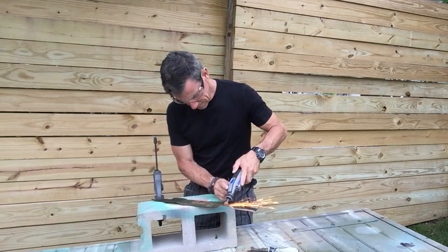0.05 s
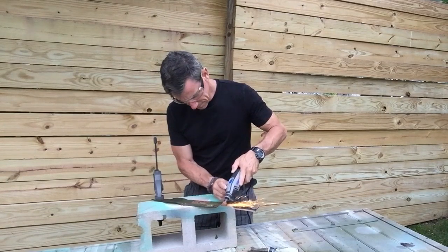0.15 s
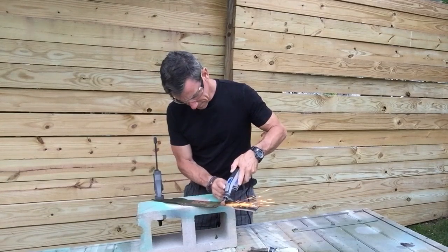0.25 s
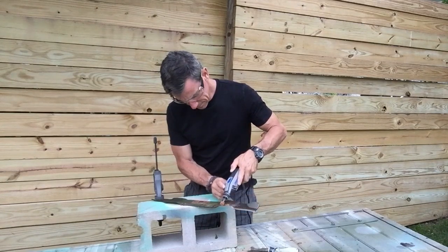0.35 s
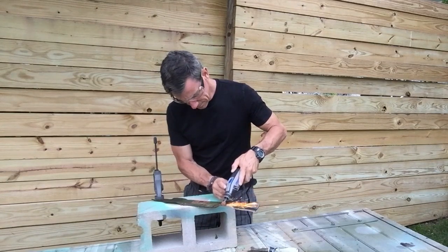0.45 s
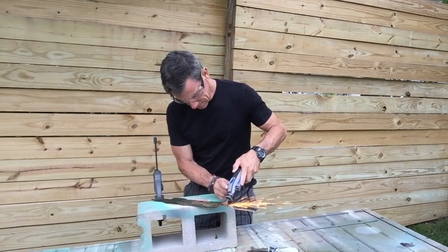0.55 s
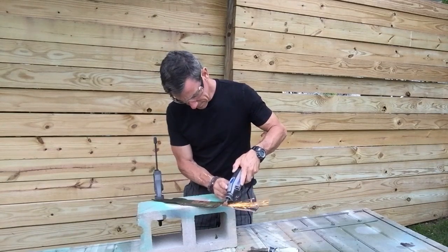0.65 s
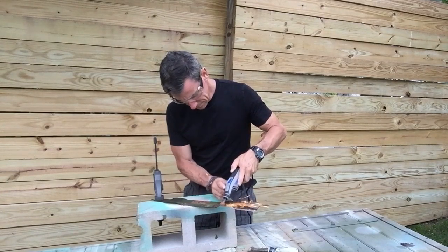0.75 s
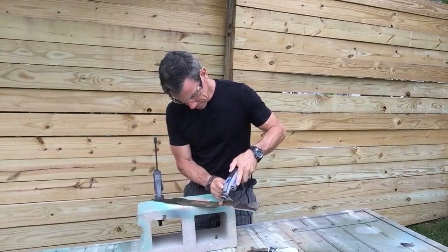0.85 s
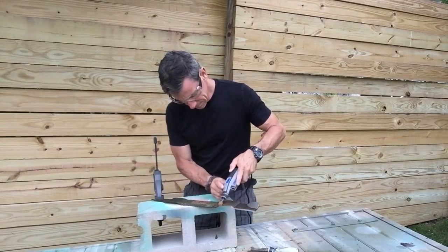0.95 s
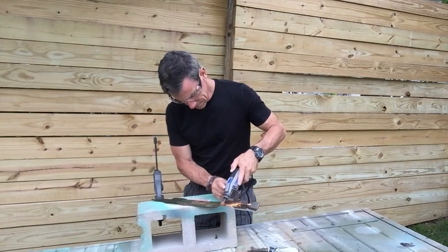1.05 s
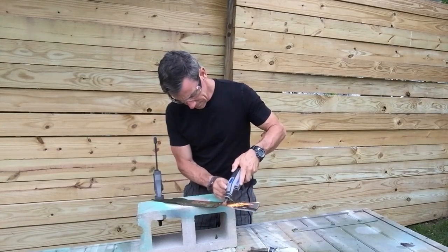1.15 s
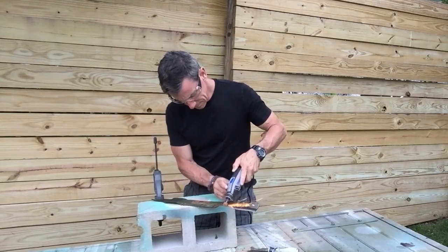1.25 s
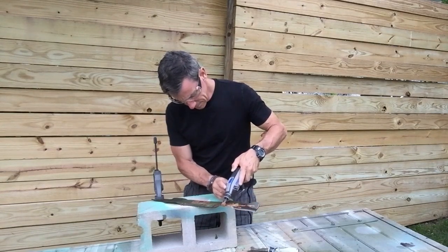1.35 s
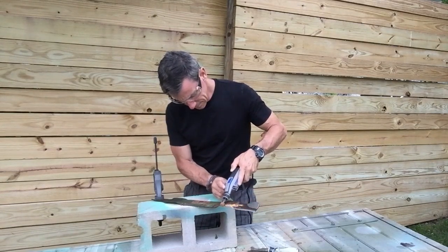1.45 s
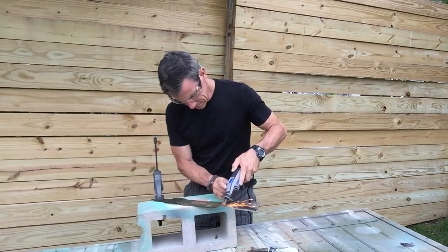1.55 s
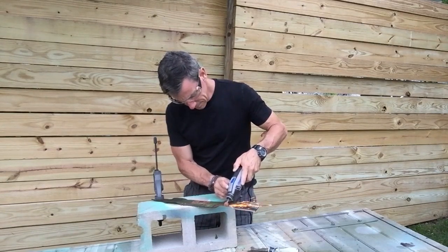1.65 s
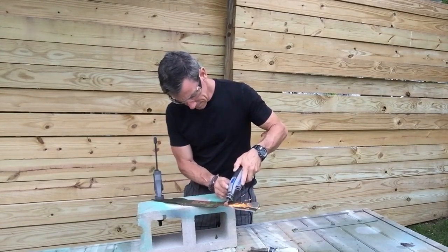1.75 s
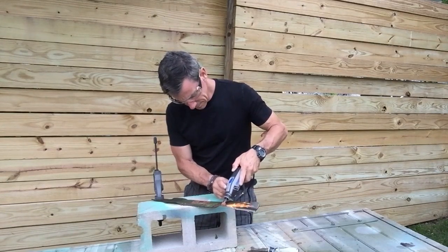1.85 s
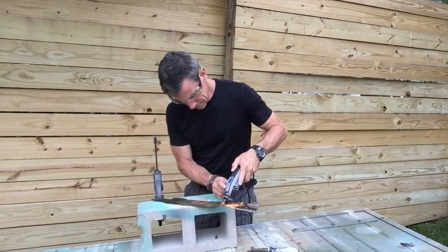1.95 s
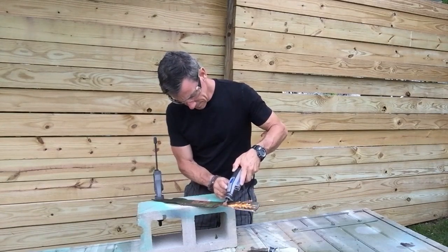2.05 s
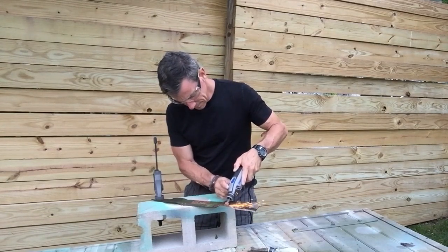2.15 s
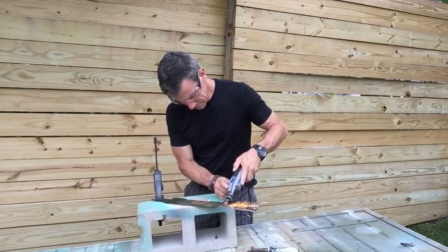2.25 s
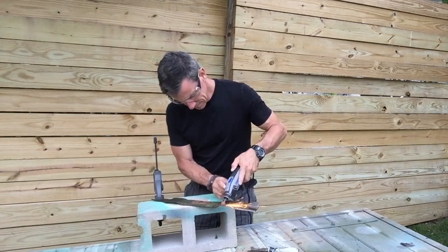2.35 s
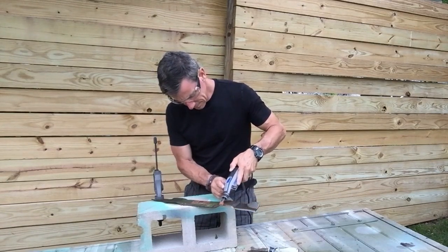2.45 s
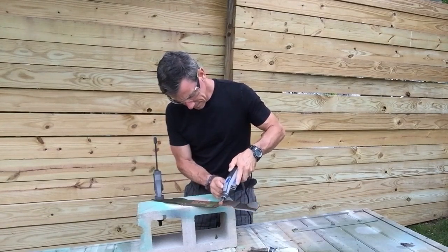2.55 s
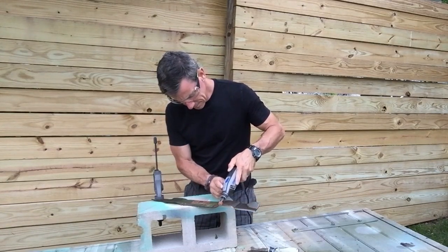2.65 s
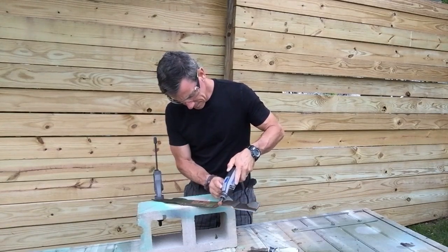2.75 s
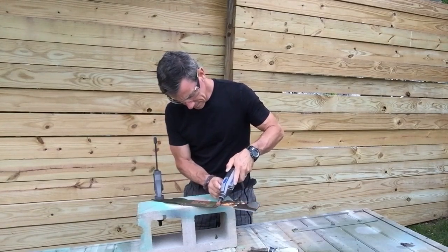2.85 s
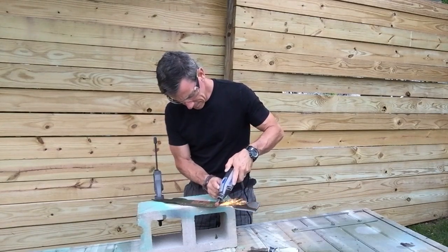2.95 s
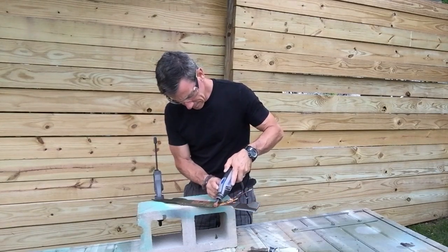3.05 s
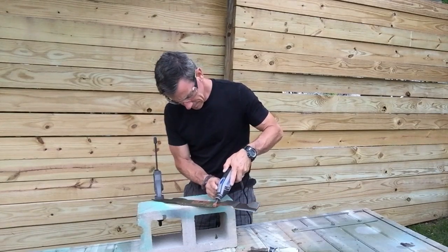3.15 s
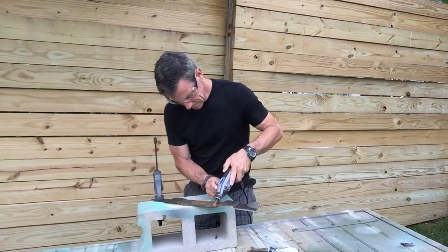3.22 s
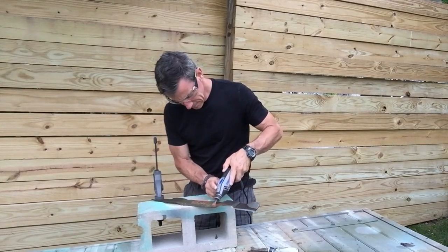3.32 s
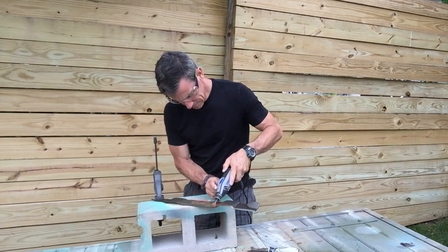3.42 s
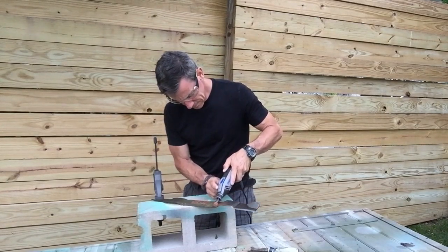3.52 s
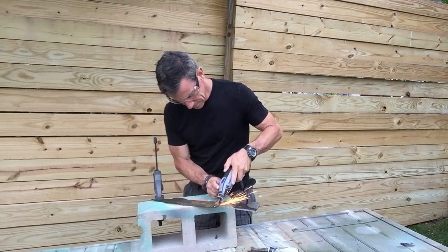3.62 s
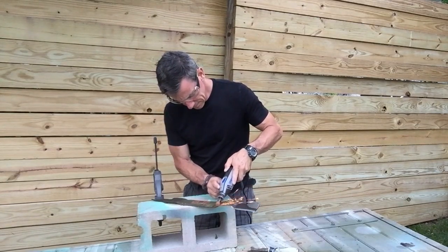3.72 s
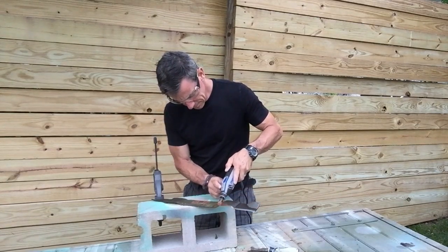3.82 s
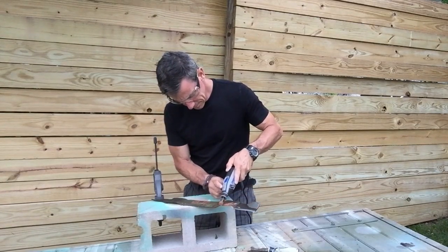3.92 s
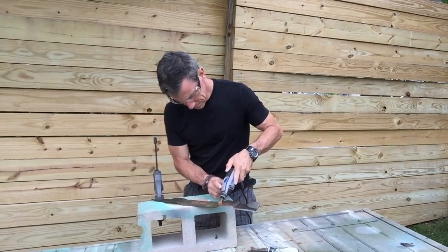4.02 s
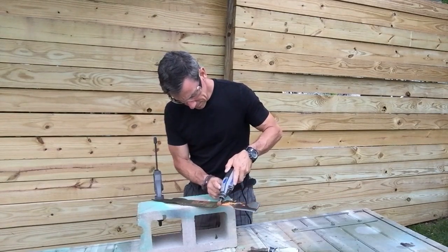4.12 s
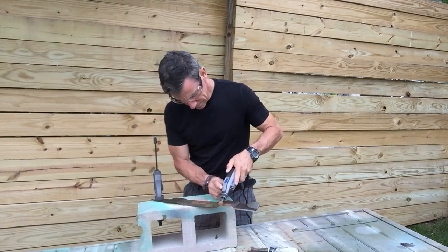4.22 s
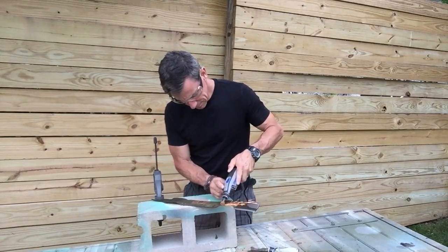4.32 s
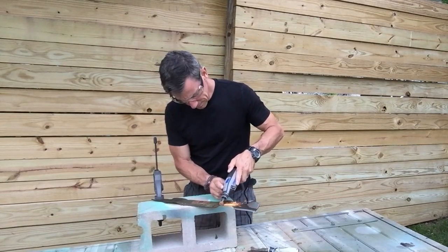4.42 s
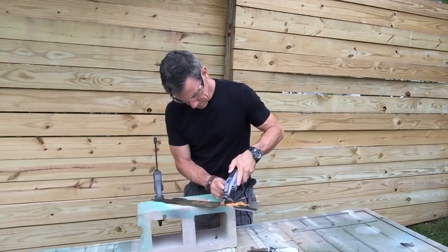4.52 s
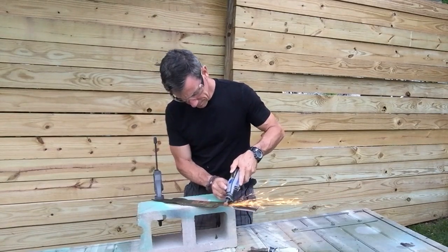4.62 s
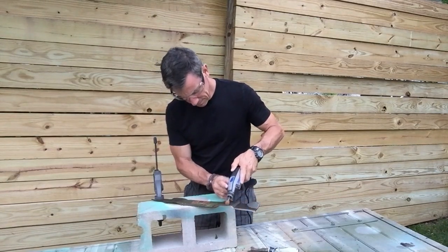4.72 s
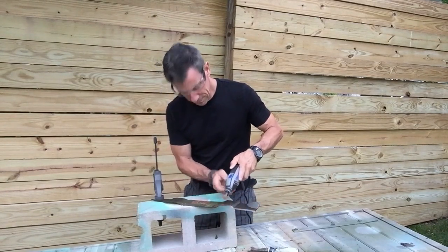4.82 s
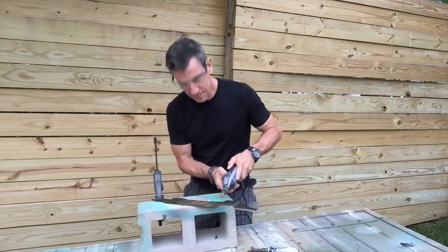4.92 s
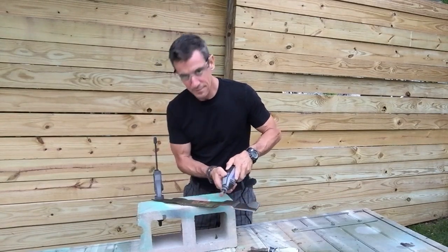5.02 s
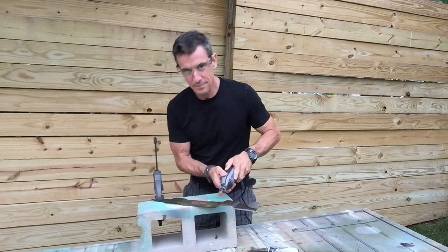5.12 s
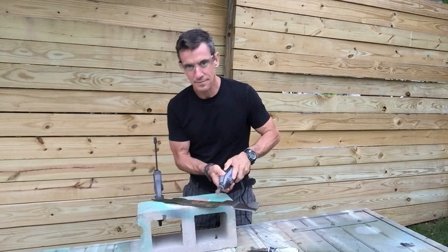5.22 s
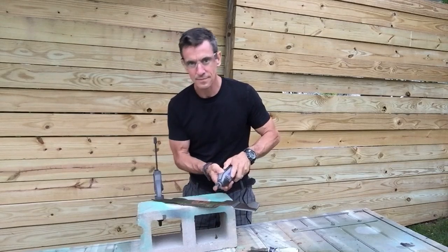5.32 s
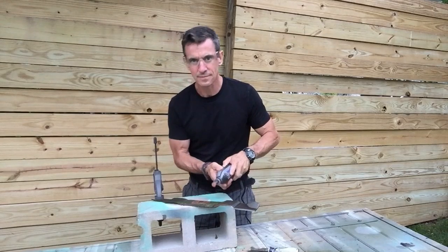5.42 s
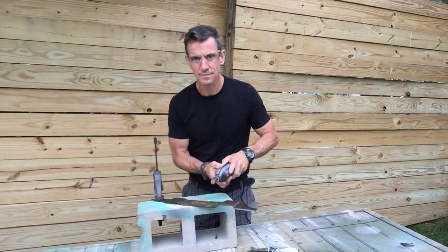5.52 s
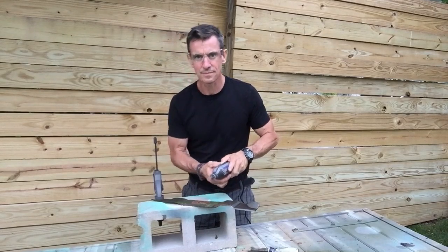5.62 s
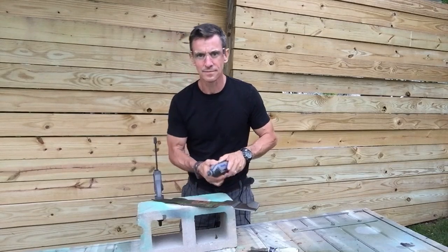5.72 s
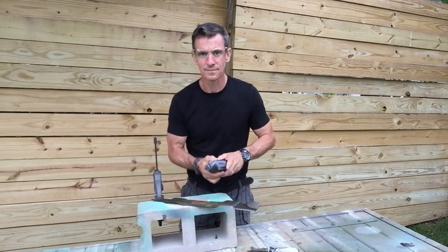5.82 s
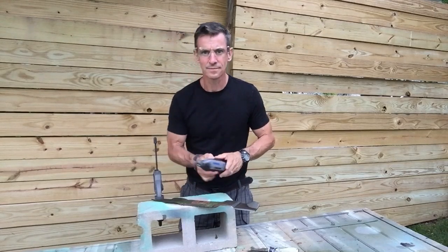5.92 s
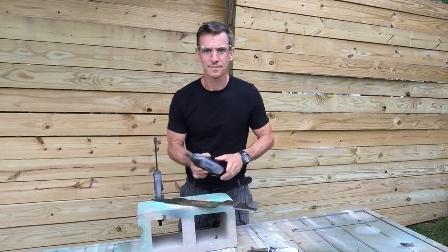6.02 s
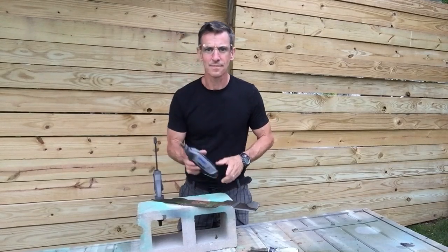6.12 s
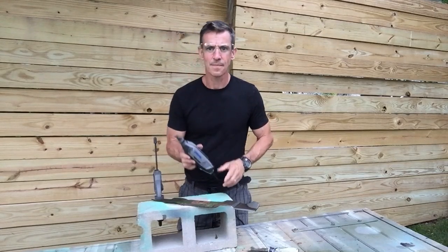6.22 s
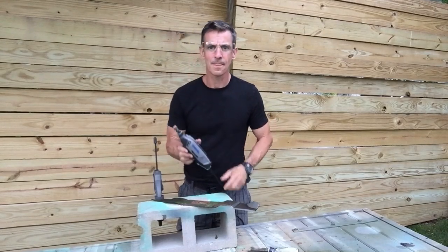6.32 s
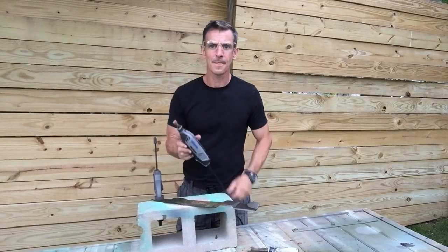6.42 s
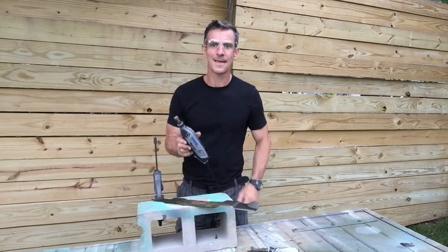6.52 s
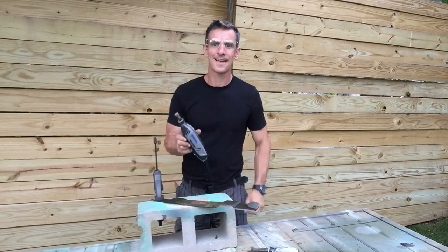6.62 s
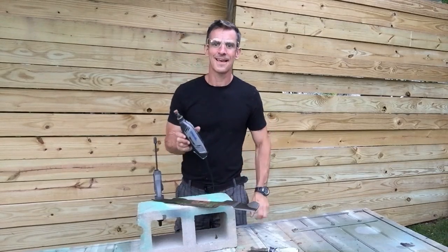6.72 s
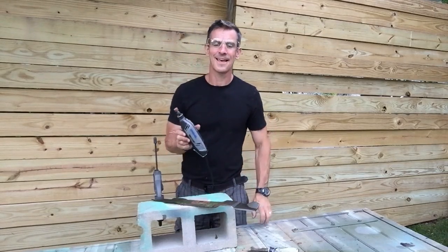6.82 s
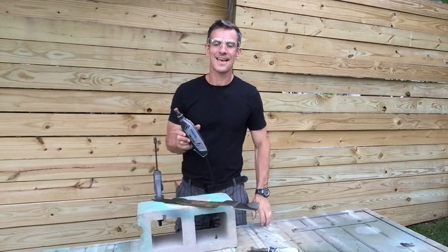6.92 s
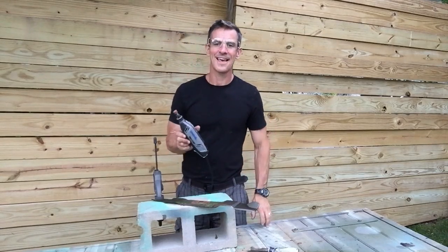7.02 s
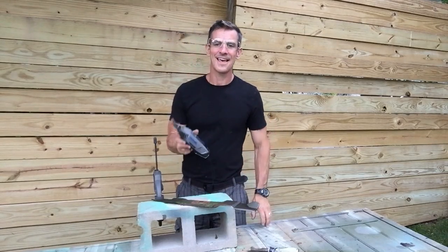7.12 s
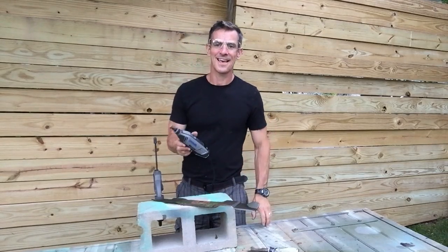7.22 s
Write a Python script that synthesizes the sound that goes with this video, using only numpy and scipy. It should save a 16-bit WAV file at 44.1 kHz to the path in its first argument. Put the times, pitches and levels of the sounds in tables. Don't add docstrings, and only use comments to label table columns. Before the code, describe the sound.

Harsh, bright grinding of metal fills the first part, constantly shifting as the wheel digs in, chatters and eases off, with shrill blade ringing over a steady high-speed buzz. Then the contact noise stops, leaving a thinner motor whine that rises briefly and sweeps downward as it coasts, its fan hiss dulling. Soft low knocks and faint far traffic lie underneath. Open yard beside a wooden wall, centred mono sound.

```python
import sys
import numpy as np
from scipy import signal
from scipy.fft import rfft, irfft, next_fast_len
from scipy.io import wavfile

SR = 44100
rng = np.random.default_rng(int(sys.argv[2]) if len(sys.argv) > 2 else 0)


def put_to_file(sound):
    columns = np.atleast_2d(sound).T
    safe = np.clip(columns, -1, 1)
    whole_steps = np.round(safe * 32767)
    wavfile.write(sys.argv[1], SR, whole_steps.astype(np.int16))


def ratio(d):
    e = np.asarray(d, float) / 20
    return 10 ** e


N = 320607
T = np.arange(N) / SR
SLOW = T[::40]
LIFT_S = 4.79
CHATTER_SHARE = 1 / 6
BEARING_ORDERS = {7: 7.08, 9: 9.15, 11: 11.15, 13: 13.15}


def wheel(angle):
    # start in seconds, length in seconds, orders 8-10 in dB, higher orders in dB.
    seats = [(0, 0.14, -26.5, -29), (.2, .38, -23.5, -32.5), (.85, 0.35, -24, -37), (1.4, 0.23, -29.5, -55),
             (1.93, .17, -29, -46), (2.38, 0.18, -33, -44), (2.5, 0.467, -23, -32),
             (3.15, 0.24, -32, -35.5), (3.4, .2, -28.5, -35.5), (3.95, 0.18, -31.5, -32),
             (4.2, 0.12, -24.5, -35.5), (4.38, 0.19, -24, -31.5), (4.6, 0.15, -26.5, -33)]
    seat_rest_db = -41
    seat_mid_db = spells(seats, seat_rest_db)
    seat_high_db = spells(seats, -42, column=3)
    chatter_low_db, chatter_high_db = chatter_levels()
    spread = np.clip(ratio(chatter_low_db + 28), 0, 1) ** 2

    steady = np.clip((-33 - chatter_high_db) / 8, 0, 1)
    hush_db = 0.55 * (seat_mid_db - seat_rest_db) * steady
    depth = np.clip(gain_of(chatter_high_db + 15), 0, 1)

    low = imbalance(angle, spread)
    contact = strike(angle, seat_mid_db, seat_high_db)
    contact += chatter(angle, chatter_low_db, chatter_high_db)
    contact += grit(angle, depth, spread, hush_db)
    touching = np.clip((LIFT_S - T) / 0.039, 0, 1)
    handover = np.clip((4.735 - T) / 0.16, 0, 1)
    return handover * low + touching * contact


def strike(angle, seat_mid_db, seat_high_db):
    # order, level in dB.
    strike_orders = [(1, -19), (2, -10), (3, -4), (4, -11), (5, -20.5), (6, -7.5), (7, -9.5), (8, -7.5),
                     (9, -3.5), (10, -11.5), (11, -14), (12, 2), (13, -8.5), (14, -5.5), (15, -4), (16, -5),
                     (17, -6.5), (18, -7), (19, -4), (20, -35), (21, -12), (22, -10), (23, -13), (24, -22),
                     (25, -9), (26, -33), (27, -32), (28, -13)]
    # start in seconds, length in seconds, level in dB.
    tilts = [
        (0, 0.34, -31),
        (1.2, .26, -32),
        (1.62, 0.92, -31.5),
        (2.74, .08, -36),
        (2.98, 0.6, -32),
        (4.4, 0.27, -39.5),
        (4.62, 0.32, -30),
    ]
    tilt_db = spells(tilts, -38.5) + 6
    wander = angle + 0.03 * np.interp(T, SLOW, drift(63))
    out = np.zeros(N)
    for order, db in strike_orders[4:]:
        if order < 8:
            seat_db = tilt_db
        elif order < 11:
            seat_db = seat_mid_db
        else:
            seat_db = seat_high_db
        out += gain_of(db - 1 + seat_db + 2 * drift(2.9)) * line(order, wander)
    return out + gain_of(-39.5 + 2 * drift(3)) * line(BEARING_ORDERS[7], angle)


def imbalance(angle, spread):
    # order, level in dB, gain after the regrip in dB, loss in full chatter in dB.
    unbalance = [
        (1, -48.5, 4, 0.5),
        (2, -42.5, 2.5, 16.5),
        (3, -29.5, -0.5, 12.5),
        (4, -44, 8.5, 30),
    ]
    regrip = np.clip((SLOW - 2.53) / 0.1, 0, 1)
    out = np.zeros(N)
    for order, db, up_db, loss_db in unbalance:
        level_db = db + up_db * regrip - loss_db * spread + drift(1.4)
        out += gain_of(level_db) * line(round(order), angle)
    return out


def chatter_levels():
    # start in seconds, length in seconds, low level in dB, high level in dB.
    chatters = [(.4, .38, -47.5, -34.5), (.8, 0.41, -42.5, -29), (1.2, 0.45, -43, -33),
                (1.55, 0.12, -36, -31), (1.72, 0.29, -42, -36), (1.98, 0.26, -35.5, -34),
                (2.3, 0.25, -37.5, -35), (2.84, 0.22, -41.5, -31.5), (3.44, 0.11, -46, -33.5),
                (3.62, 0.43, -35, -37), (4.08, 0.28, -43, -32.5)]
    return spells(chatters, -50), spells(chatters, -39.5, column=3)


def chatter(angle, low_db, high_db):
    # order, level in dB.
    bounce = [(.6, -12), (1.3, -53), (1.8, -9.5), (2.4, -14.5), (3, -6), (3.6, -5.5), (4.2, -12), (5, -22),
              (6, -19), (6.4, -3.5), (7.5, -16.5), (8.9, -4), (9.6, -17.5), (12, -10.5), (20, -36)]
    grind = slice(0, round(4.85 * SR))
    spread_db = np.clip(1.5 * (low_db + 31), -10, 0)
    out = np.zeros(N)
    for sixth in range(4, 120):
        if sixth % 6 == 0:
            continue
        order = sixth * CHATTER_SHARE
        db = np.interp(order, *np.transpose(bounce)) + 3.5 * drift(5.1)
        db = db + (low_db if order < 4.7 else high_db)
        if sixth % 6 not in (1, 5):
            db = db + spread_db
        out[grind] += gain_of(db, grind) * line(order, angle[grind])
    return out


def grit(angle, depth, spread, hush_db):
    # centre in Hz, width in Hz, level in dB.
    main_ring = [(5227, 17, -6.5), (5360, 330, -10.5), (5786, 48, 0.5), (5935, 260, 0), (8190, 720, -7)]
    # centre in Hz, width in Hz, level in dB.
    body_ring = [(2980, 24, -3.5), (3210, 95, -7), (3575, 39, -1), (4560, 78, -7), (6540, 210, -4.5),
                 (7083, 98, 0), (8590, 62, 0), (9310, 110, -2.5), (10830, 100, 0), (12060, 230, 0),
                 (13300, 150, -14), (14400, 250, -4), (15200, 300, -3.5)]
    # frequency in Hz, level in dB per Hz.
    rasp = [(2350, -50), (4000, -10), (5460, -13), (5910, -4.5), (6750, -10.5), (11000, -7.5), (15800, -19)]
    # frequency in Hz, level in dB per Hz.
    scrape = [(500, -14), (800, -11), (1200, -3), (1600, 0), (2500, 0), (3500, -1.5), (4800, 0),
              (6500, -21)]
    # start in seconds, length in seconds, ring level in dB.
    digs = [(.0, 0.19, -25), (.28, 0.11, -27.5), (.6, 0.25, -23), (1.05, 0.19, -30), (1.22, 0.16, -24.5),
            (1.47, 0.19, -24), (1.7, .22, -22.5), (1.98, 0.16, -23.5), (2.12, 0.34, -22.5),
            (2.62, .14, -27.5), (2.86, 0.17, -24), (3.05, 0.097, -24), (3.47, .1, -27.5), (3.62, 0.17, -24),
            (3.73, 0.22, -23.5), (4.15, 0.12, -22.5), (4.6, 0.067, -22.5), (4.7, 0.14, -20.5)]
    # start in seconds, length in seconds, rasp change in dB.
    eases = [
        (.85, 0.084, -7),
        (1.06, 0.073, -6.5),
        (2.48, 0.11, -3),
        (2.75, .2, -9),
        (3.17, .44, -7.5),
        (3.9, 0.09, -6),
        (4.14, 0.21, -3),
    ]
    ring_db = spells(digs, -31)
    rasp_db = -26.5 + spells(eases, 0) + 0.15 * (ring_db + 28.5)
    scrape_db = -34 + 0.26 * (ring_db + 25.5) + 1.1 * spread
    gate = (1 + depth * np.cos(CHATTER_SHARE * angle)) * (1 + 1.2 * np.cos(angle))

    out = gain_of(ring_db) * rings(main_ring, gate, patchy_db=2.5)
    out += gain_of(rasp_db - 2.5 - 0.24 * hush_db) * rings(body_ring, gate, patchy_db=3.5)
    out += gain_of(rasp_db - 3.5 - hush_db + drift(6.3)) * colour(gate * worn_grit(angle), rasp)
    scrape_gain = gain_of(scrape_db - 0.16 * hush_db + drift(15))
    return out + scrape_gain * colour(gate * rng.standard_normal(N), scrape)


def worn_grit(angle):
    grains_per_turn, repeat_share = 96, 0.65
    turns = angle / (2 * np.pi)
    fresh = rng.standard_normal((int(turns[-1]) + 2, grains_per_turn))
    grains = signal.lfilter([1], [1, -repeat_share], fresh, axis=0)
    return np.interp(turns * grains_per_turn, np.arange(grains.size), grains.ravel())


def rings(modes, gate, patchy_db):
    out = np.zeros(N)
    for hz, width_hz, db in modes:
        driven = resonance(gate * rng.standard_normal(N), hz, 3 * width_hz)
        ring = rms_one(resonance(driven, hz, width_hz))
        out += gain_of(db + patchy_db * drift(6.8)) * ring
    return rms_one(out)


def shaft():
    # time in seconds, speed in turns per second.
    loaded = [(0, 498), (.3, 502.5), (.9, 504.5), (1.3, 504.5), (1.8, 509.5), (2.48, 513.5), (2.82, 505.5),
              (3.1, 503), (3.55, 501.5), (3.95, 507.3), (4.25, 506.5), (4.55, 501.5), (4.72, 494.5)]
    free_hz, spin_up_s, off_s = 563, 0.43, 5.295
    release_s, release_hz = loaded[-1]
    free_s = np.clip(SLOW, release_s, off_s) - release_s
    coast_s = np.clip(SLOW - off_s, 0, None)
    held_hz, = in_time(loaded)
    speed = held_hz + (free_hz - release_hz) * (1 - np.exp(-free_s / spin_up_s))
    speed = speed - 365.8 * (1 - np.exp(-coast_s / 1.6)) - 100.2 * coast_s
    jittered = np.interp(T, SLOW, speed * (1 + 0.000298 * drift(26)))
    return speed, 2 * np.pi * np.cumsum(jittered) / SR


def motor(speed, angle):
    halvings = np.log2(545 / speed)
    sound = whine(speed, angle, halvings) + fan_hiss(speed, angle, halvings)
    return np.clip((T - 4.71) / 0.021, 0, 1) * sound


def whine(speed, angle, halvings):
    # order, level in dB.
    motor_orders = [(2, -11), (5, -1), (6, -5.5), (8, -2.5), (9, 1), (10, -0.5), (11, 4), (13, -1), (16, 1),
                    (17, -2), (26, -3), (40, 0.5), (56, 4)]
    # order, level at full speed in dB, loss per halving of speed in dB.
    free_orders = [
        (1, -51, 14.5),
        (3, -41.5, 17.5),
        (4, -52, 14.5),
        (7, -41.5, 3),
    ]
    # centre in Hz, width in Hz, gain in dB.
    housing = [(1350, 46, 13), (1483, 41, 26), (1638, 45, 16), (2330, 61, 9), (3320, 390, 11),
               (4090, 670, 3.5), (6180, 610, 2.5), (8470, 750, 5.5)]
    # centre in Hz, width in Hz, gain in dB.
    casing = [(384, 38, 16), (486, 28, -14), (910, 42.4, 7.5), (1334, 180, 16.5), (1644, 170, 10.5),
              (2163, 48, 19.5)]
    coast = slice(round(4.7 * SR), N)
    loss_db, bar_loss_db = 12, 9
    swell_db = -10.5 * np.exp(-np.clip(SLOW - LIFT_S, 0, None) / 0.15)
    whine_db = -44.5 - loss_db * halvings + swell_db

    levels = {}
    for order, db, order_loss_db in free_orders:
        levels[round(order)] = db - order_loss_db * halvings + (order > 4) * swell_db
    for order, db in motor_orders:
        levels[order] = whine_db + db

    out = np.zeros(N)
    for k in range(1, 130):
        high = k > 4
        bar_db = 2.5 if k % 8 == 0 else -8
        plain_db = whine_db + bar_db + 1.5 * np.log2(min(k, 56) / 32) + rng.normal(0, 2.5)
        order = BEARING_ORDERS.get(k, k)
        hz = order * speed
        flutter_db = 0.8 + 2.6 * high - 1.8 * (k == 7)
        db = levels.get(k, plain_db) - 6 * high + flutter_db * drift(9)
        db = db + (k > 14) * (loss_db - bar_loss_db) * halvings
        gain = ratio(db) * flare(hz, housing if high else casing)
        gain = gain / (1 + (hz / 8500) ** 2) / (1 + high * (950 / hz) ** 6)
        gain = gain * (hz < 0.4 * SR)
        out[coast] += np.interp(T[coast], SLOW, gain) * line(order, angle[coast])
    return out


def fan_hiss(speed, angle, halvings):
    # frequency in Hz, level in dB per Hz.
    fast_fan = [(350, -22), (850, -12), (1560, 0.5), (2630, -4), (3190, -2), (4550, -7), (6320, -6.5),
                (12200, -13), (15800, -14)]
    # frequency in Hz, level in dB per Hz.
    slow_fan = [(600, -24), (1200, -10), (1500, -6), (2400, -12), (3200, -16), (4500, -21), (7200, -23),
                (8400, -15), (9600, -22), (15800, -48)]
    fast = np.interp(T, SLOW, np.clip((speed - 170) / 200, 0, 1))
    air = rng.standard_normal(N) * (1 + 0.065 * np.cos(angle))
    hiss = fast * colour(air, fast_fan) + (1 - fast) * ratio(-1) * colour(air, slow_fan)
    fan_db, bearing_db = -29 - 13 * halvings, -46.5
    level_db = 10 * np.log10(ratio(2 * fan_db) + ratio(2 * bearing_db))
    return gain_of(level_db - 1.5 + 0.5 * drift(12)) * hiss


def echo(tool):
    lag = round(0.007 * SR)
    tool[lag:] += ratio(-17) * tool[:-lag]
    return tool


def thumps():
    # start in seconds, peak level in dB, top frequency in Hz, length in seconds.
    knocks = [
        (0.017, -25, 440, 0.057),
        (0.377, -26.5, 413, 0.058),
        (0.704, -29.5, 405, 0.058),
        (3.538, -34.5, 300, 0.06),
        (4.352, -37, 180, 0.09),
        (5.659, -30.5, 410, 0.04),
        (6.406, -34, 133, 0.19),
    ]
    out = np.zeros(N)
    for start_s, db, top_hz, length_s in knocks:
        age = np.clip(T - start_s, 0, None) / length_s
        band = signal.butter(2, [100, top_hz], "band", fs=SR, output="sos")
        puff = rms_one(signal.sosfilt(band, rng.standard_normal(N)))
        out += ratio(db - 4.5) * puff * 5 * age * np.exp(-4 * age)
    return out


def yard():
    # frequency in Hz, level in dB per Hz.
    rumble = [(20, -45), (35, -20), (60, -2), (100, 0), (200, -8), (400, -13), (800, -19), (2000, -32),
              (6000, -46), (16000, -60)]
    level_db = -54.5 + 2 * np.clip(SLOW - LIFT_S, 0, 1) + 0.92 * drift(3)
    return gain_of(level_db) * colour(rng.standard_normal(N), rumble)


def rms_one(x):
    return x / np.sqrt(np.mean(x ** 2) + 1e-20)


def in_time(rows):
    s, *columns = np.transpose(rows)
    return [np.interp(SLOW, s, c) for c in columns]


def drift(rate_hz):
    r = np.exp(-80 * np.pi * rate_hz / SR)
    noise = rng.standard_normal(len(SLOW) + 2000)
    return rms_one(signal.lfilter([1], [1, -2 * r, r * r], noise)[2000:])


def gain_of(db, part=slice(None)):
    return np.interp(T[part], SLOW, ratio(db))


def spells(rows, rest_db, column=2):
    edge_s = 0.054
    out = np.full(len(SLOW), float(rest_db))
    for row in rows:
        start_s, end_s = row[0], row[0] + row[1]
        share = np.clip(np.minimum(SLOW - start_s, end_s - SLOW) / edge_s + 0.5, 0, 1)
        change_db = share * (row[column] - rest_db)
        out = np.where(np.abs(change_db) > np.abs(out - rest_db), rest_db + change_db, out)
    return out


def colour(x, spectrum):
    hz, db = np.transpose(spectrum)
    size = next_fast_len(N)
    log_hz = np.log(np.arange(size // 2 + 1) * SR / size + 1)
    gain = ratio(np.interp(log_hz, np.log(hz), db, -80, -80))
    return rms_one(irfft(rfft(x, size) * gain, size)[:N])


def resonance(x, hz, width_hz):
    r = np.exp(-np.pi * width_hz / SR)
    feed = np.array([1, 0, -1]) * (1 - r * r) / 2
    return signal.lfilter(feed, [1, -2 * r * np.cos(2 * np.pi * hz / SR), r * r], x)


def flare(hz, modes):
    return 1 + sum(ratio(db) / (1 + (2 * (hz - top_hz) / width_hz) ** 2) for top_hz, width_hz, db in modes)


def line(order, angle):
    return np.sqrt(2) * np.sin(order * angle + 2 * np.pi * rng.random())


def scene():
    speed, angle = shaft()
    tool = echo(wheel(angle) + motor(speed, angle))
    return np.tile(tool + thumps() + yard(), (2, 1))


def roll_off(x):
    return signal.sosfilt(signal.butter(12, 15760, fs=SR, output="sos"), x)


def record(dry):
    return roll_off(dry)


dry = scene()
out = record(dry)
put_to_file(out)
```